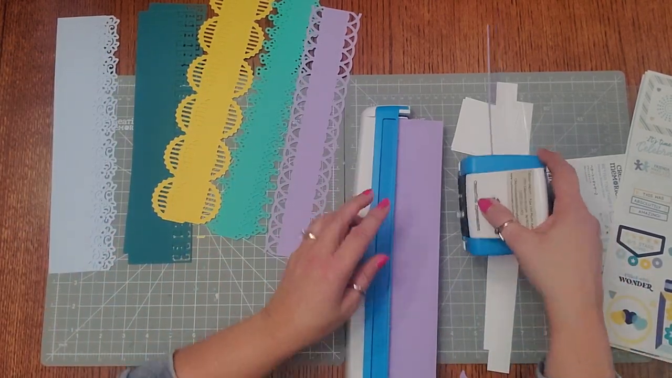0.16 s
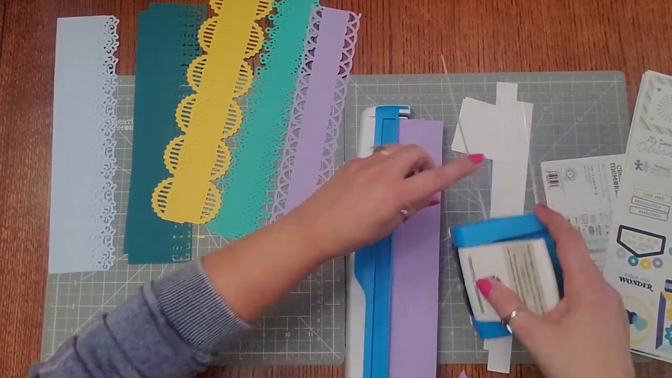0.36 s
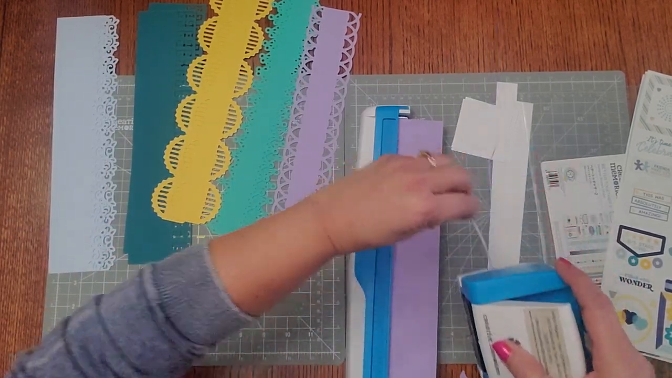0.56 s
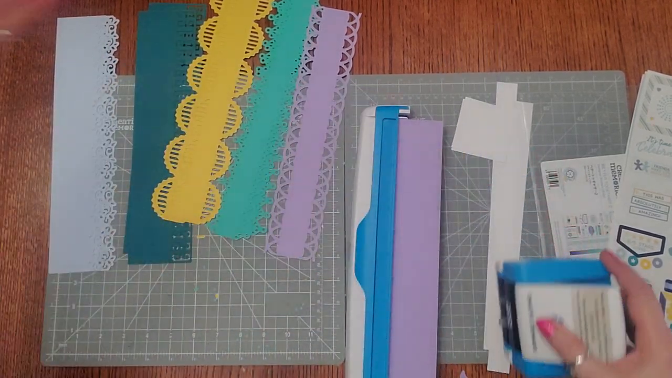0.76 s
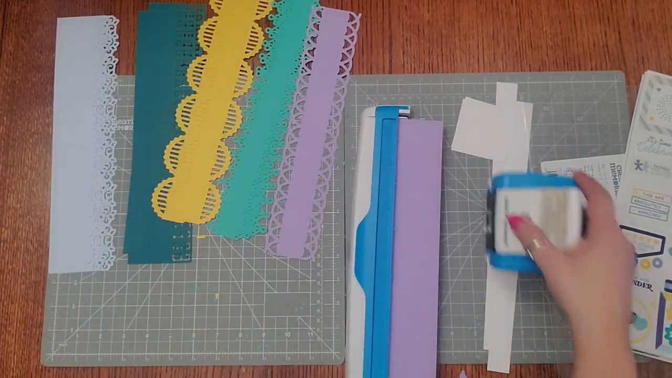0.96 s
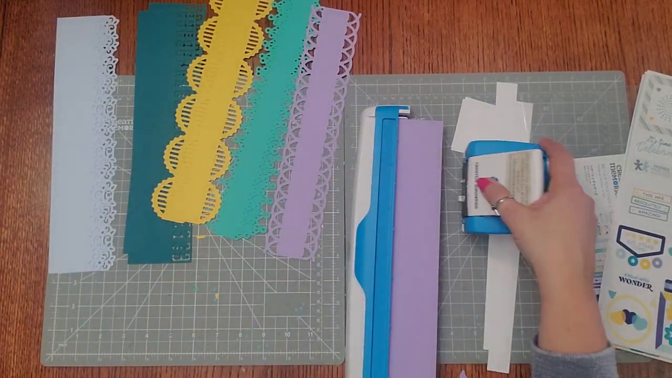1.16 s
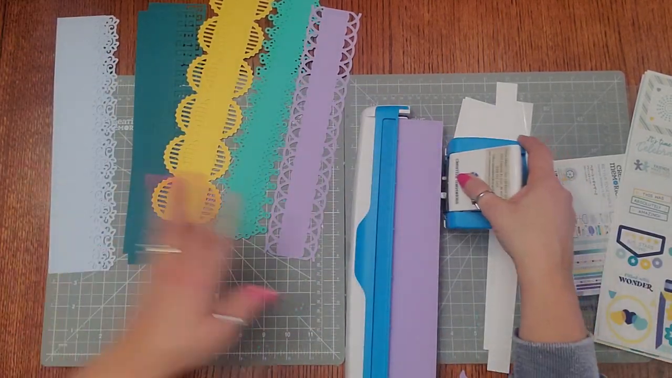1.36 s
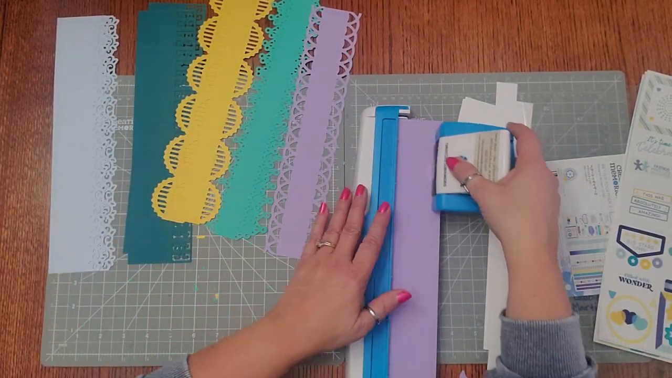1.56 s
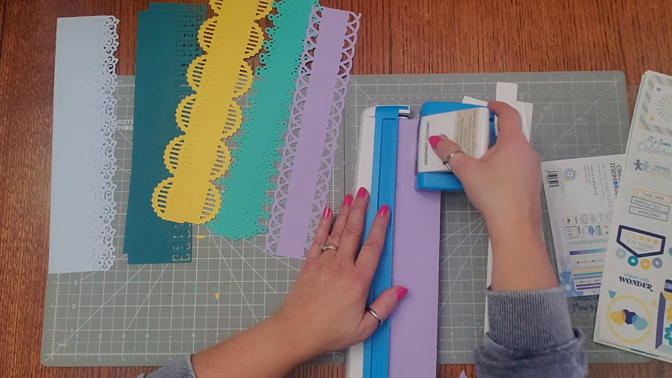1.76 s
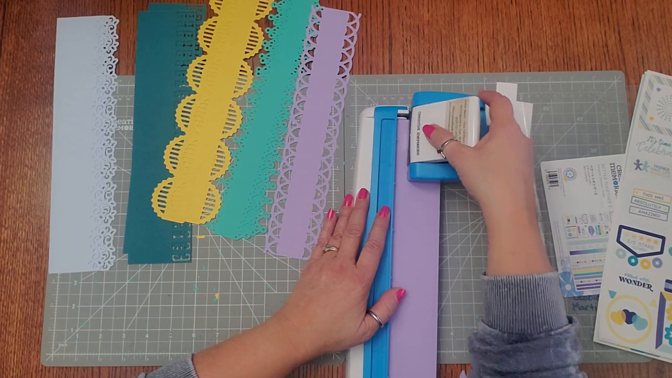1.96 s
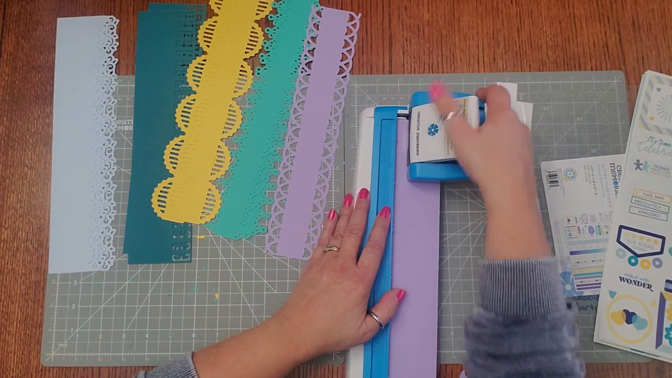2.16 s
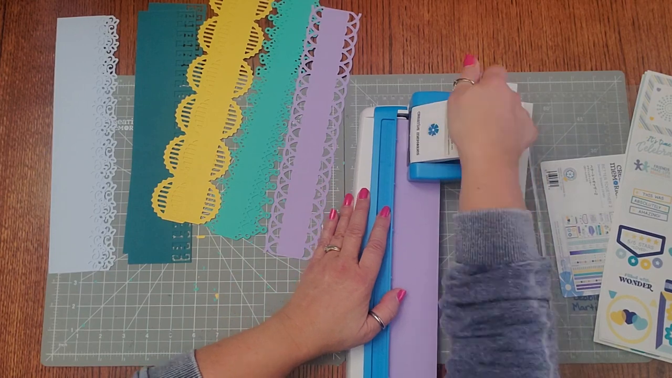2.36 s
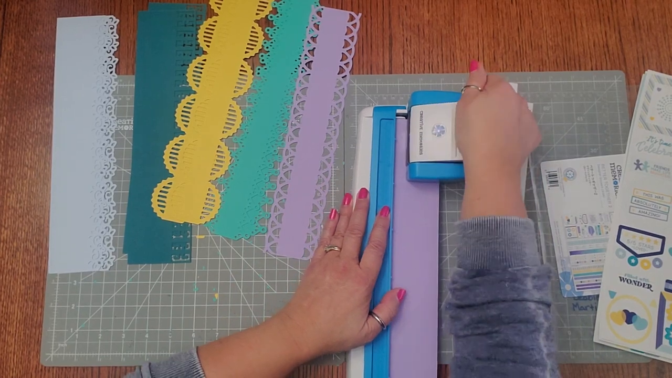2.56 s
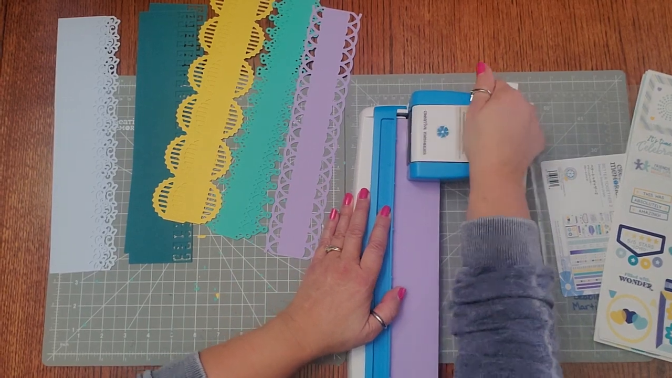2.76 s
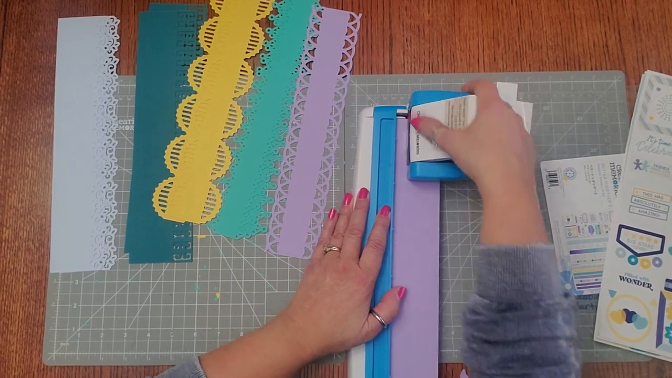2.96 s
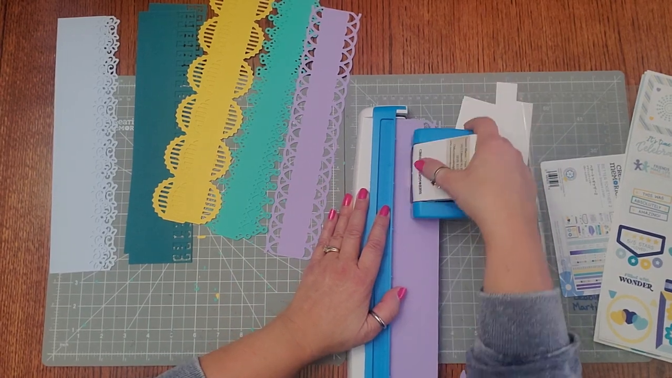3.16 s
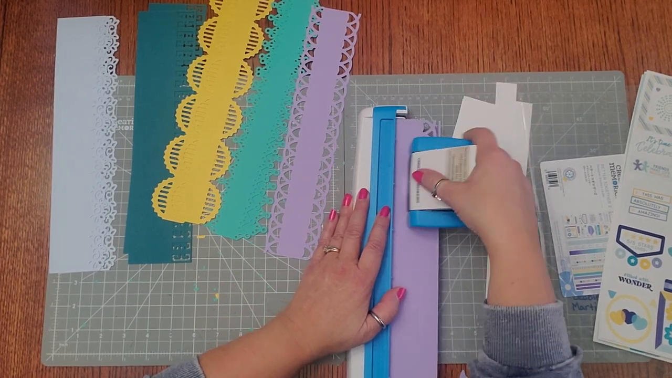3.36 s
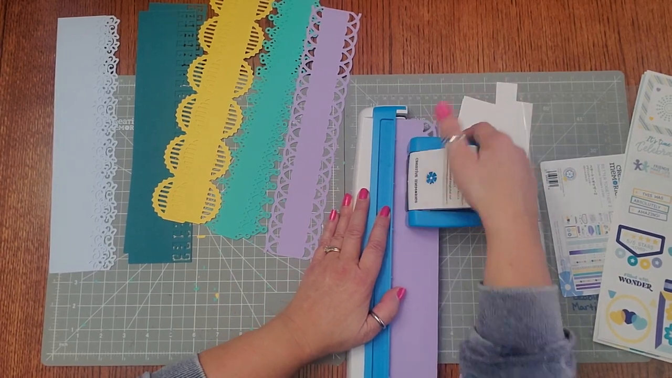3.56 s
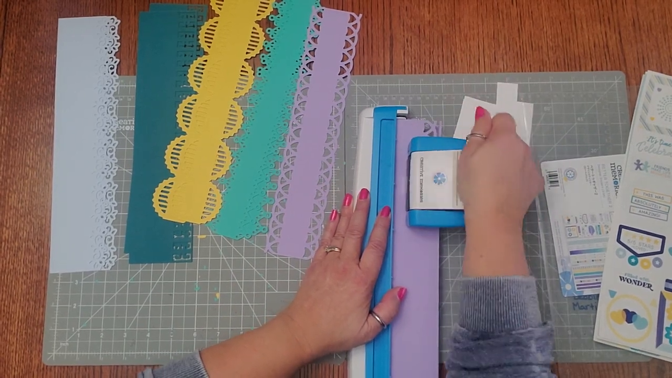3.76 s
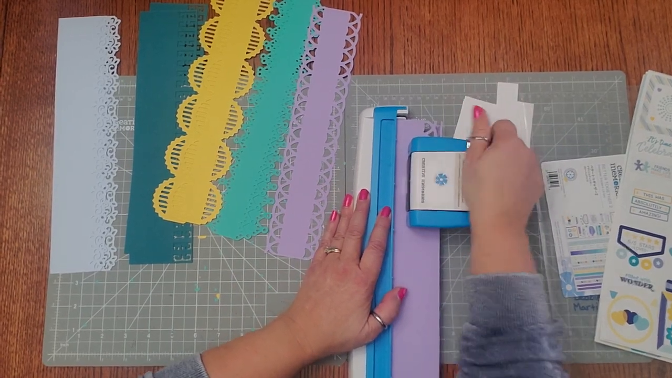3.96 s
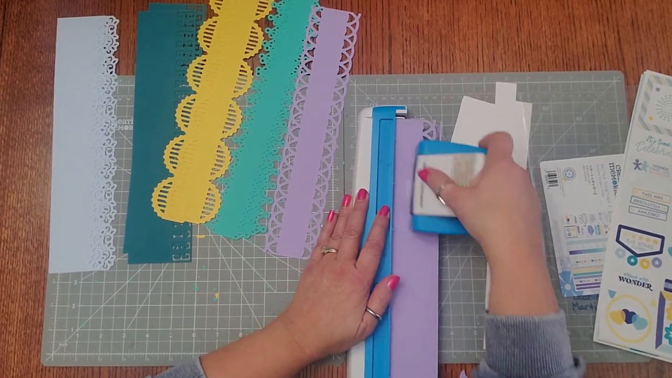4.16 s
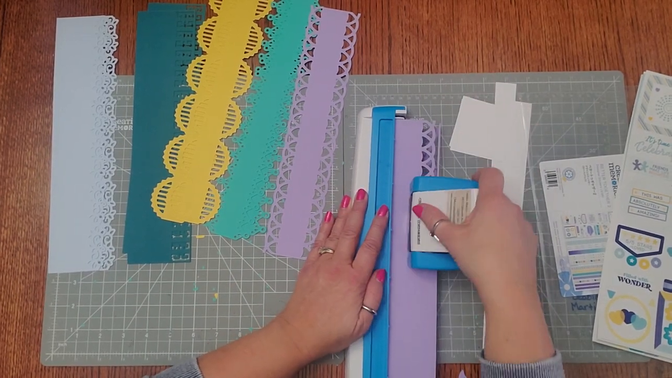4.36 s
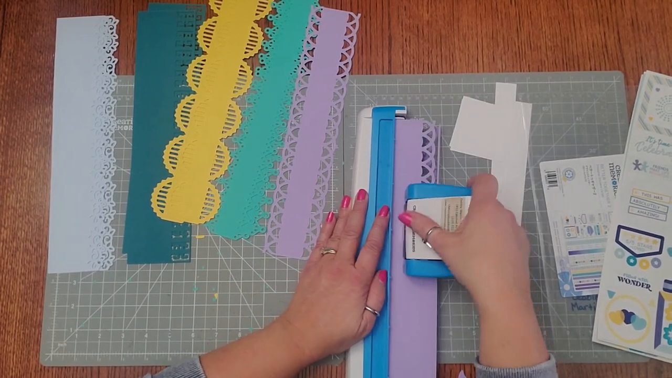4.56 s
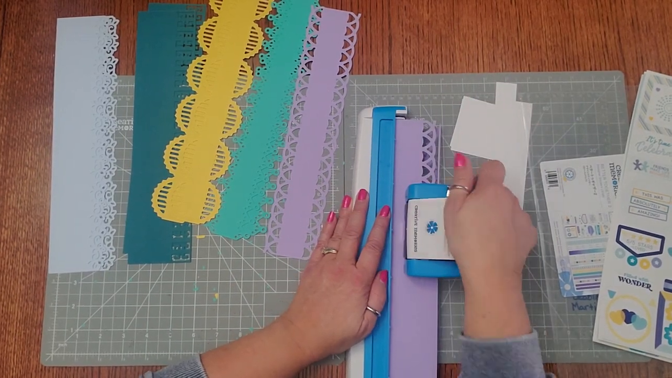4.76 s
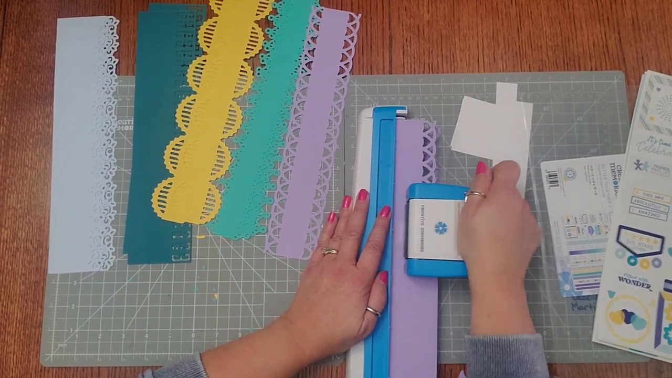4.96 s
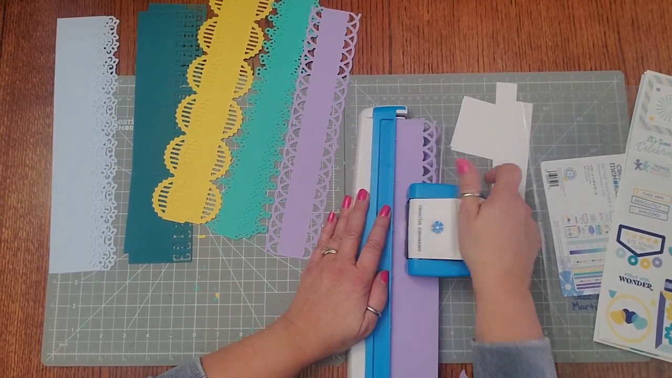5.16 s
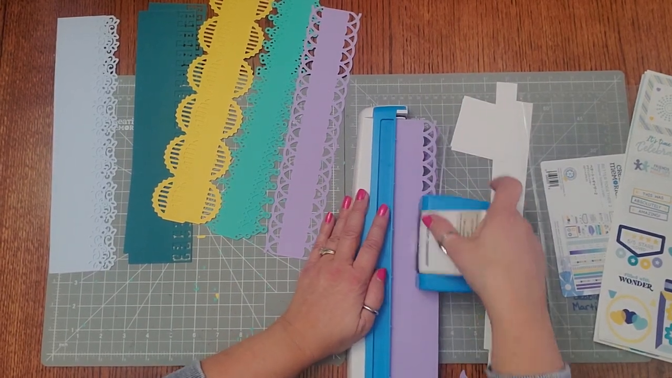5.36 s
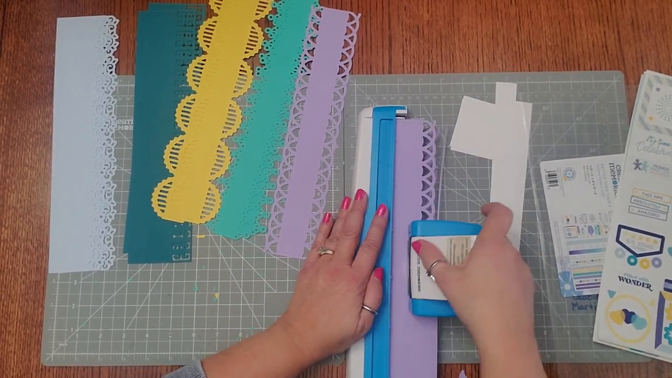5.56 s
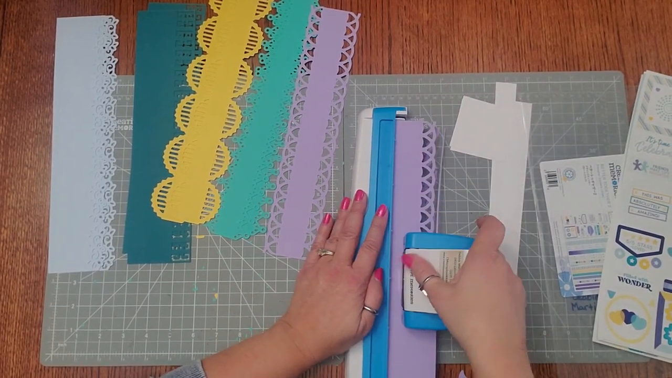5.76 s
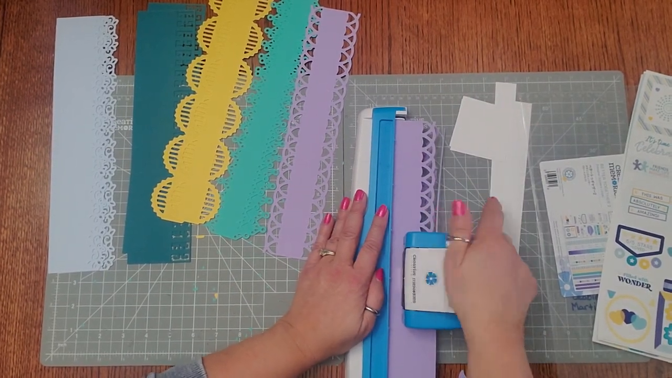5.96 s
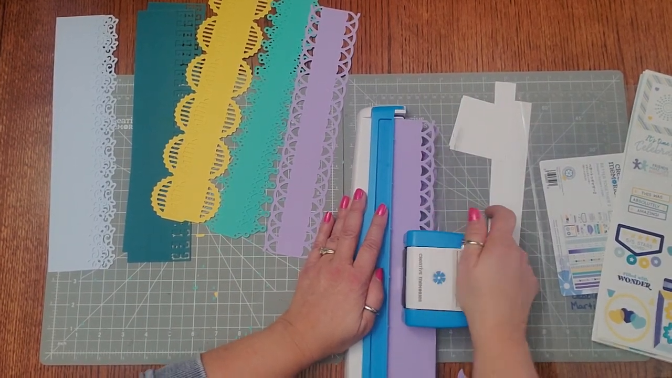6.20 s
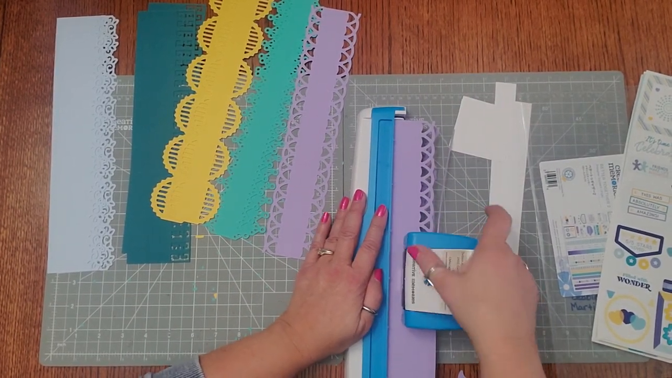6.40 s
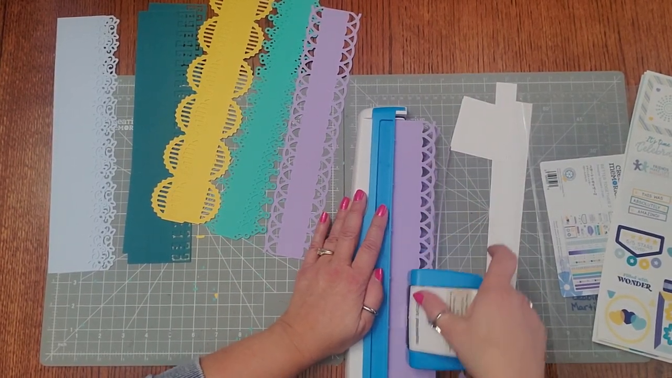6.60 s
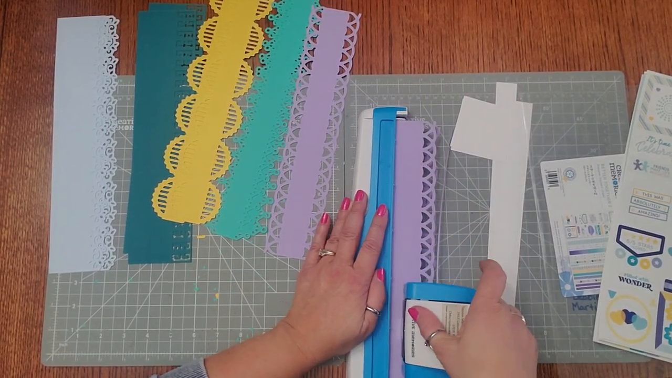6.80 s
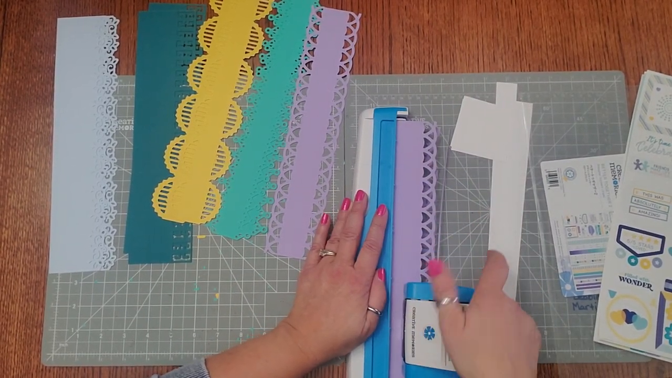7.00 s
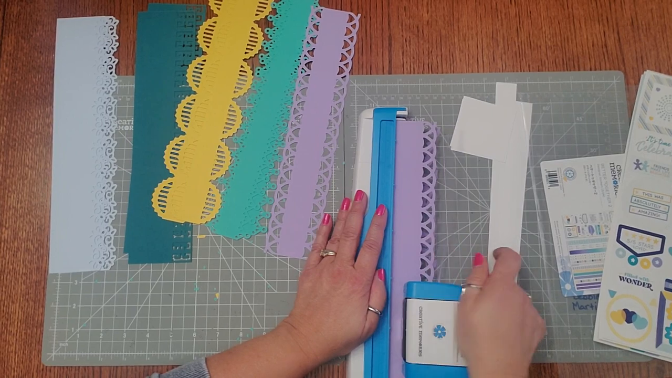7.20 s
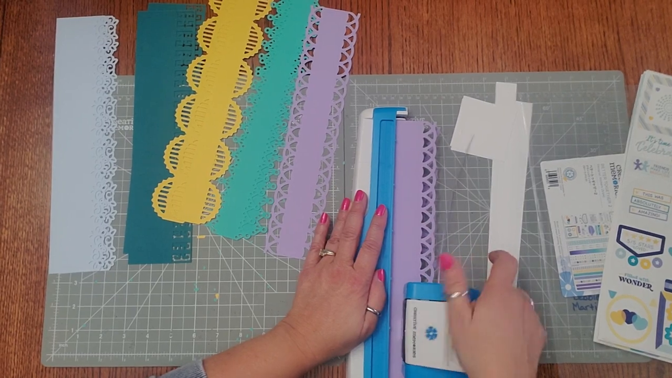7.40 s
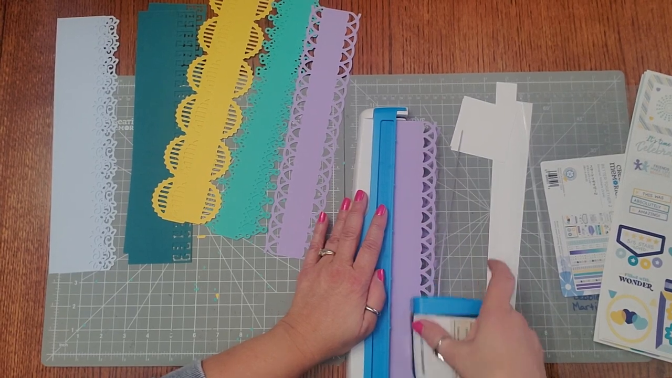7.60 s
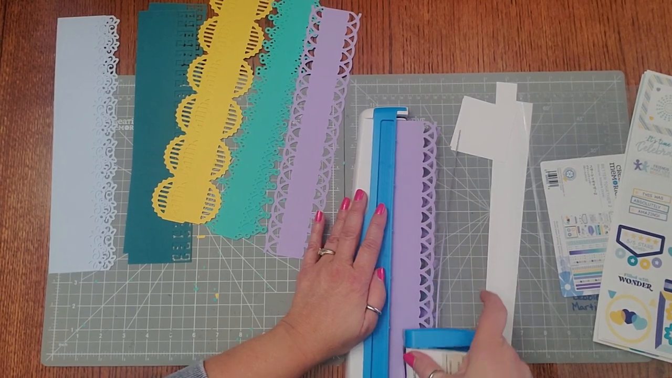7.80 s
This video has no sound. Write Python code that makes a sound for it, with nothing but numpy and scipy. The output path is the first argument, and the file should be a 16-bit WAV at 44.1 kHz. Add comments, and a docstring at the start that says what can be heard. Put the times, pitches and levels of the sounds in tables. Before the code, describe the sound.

Almost nothing at first but low room air, a faint hum and slight paper rustle. Then hands land softly and a plastic paper punch starts a regular cycle, five times over: hollow double clack, stuttering creaky bites, loud crunchy snap, papery slide, small bright click. Loose plastic ticks and the wooden table thumps beneath. Heard from overhead in stereo, with a short lively room tail, the right side duller.

```python
"""First you hear quiet room air, a faint hum, a sleeve brushing by and hands brushing paper; then a plastic
border punch at work. Five times its cartridge clacks into its seat, the lever bites in jerks, the die snaps
through card and slides back out, and the spring clicks home. Knocks are short noise bursts plus ringing tones,
rubbing and air are coloured noise, and a small live room answers every sound except the rubbing and the air. A
stereo microphone hangs overhead."""
import sys
import numpy as np
from scipy import signal
from scipy.fft import rfft, irfft, next_fast_len
from scipy.io import wavfile

SR = 44100
rng = np.random.default_rng(int(sys.argv[2]) if len(sys.argv) > 2 else 0)


def materialize(psi):
    """Save the field psi as 16-bit PCM at rate SR to the path in sys.argv[1].

    A 1-D psi becomes a single channel; in a 2-D psi each row is a channel.
    """
    bounded = np.clip(np.atleast_2d(psi).T, -1, 1)
    quanta = np.round(bounded * 32767).astype(np.int16)
    wavfile.write(sys.argv[1], SR, quanta)


N = 345744
T = np.arange(int(.7 * SR)) / SR  # time inside one short sound, seconds

# All levels in dB are relative settings.
# The die bottoms out, once a stroke: start_s, level_db, extra_thump_db, hardness_db, housing_pitch_hz
DIE_STOPS = [(2.713, -11.5, 9, 3, 400), (3.9, -7.5, 4.5, -1.5, 450), (5.049, -11.5, 8.5, -1.5, 357),
             (6.21, -8.5, 0.5, -2, 1590), (7.314, -8, 2, -2, 523)]
# Lever and die teeth bite under load: start_s, level_db, extra_thump_db, hardness_db, housing_pitch_hz
LEVER_BITES = [(2.534, -13, 0.5, 2, 714), (2.618, -13, 3, -5, 533), (2.664, -7, 4, 5.5, 356),
               (3.784, -15.5, 3.5, 0, 450), (3.822, -19, 2, -5, 523), (3.857, -8.5, 1, 3.5, 555),
               (4.904, -16, 0.5, 3, 527), (4.963, -12, -3.5, 2.5, 550), (6.101, -15, 3, 8, 460),
               (6.143, -16, 2.5, 2, 840), (6.165, -10, 0, 3.5, 540), (7.237, -15.5, -2, -0.5, 800),
               (7.277, -10, -0.5, 2.5, 600)]
# The cartridge drops into its seat, one edge and then flat:
# start_s, edge_level_db, flat_delay_s, flat_level_db, hardness_db, housing_pitch_hz
SEAT_DROPS = [(2.03, -16, 0.012, -13.5, -4, 960), (3.453, -22, .01, -15.5, -1.5, 1130),
              (4.547, -14, .007, -21.5, -6, 1150), (5.773, -13.5, .014, -12.5, 0, 1290),
              (6.892, -14, .019, -17.5, 1, 1400)]
# A corner touches the base: start_s, level_db, extra_thump_db, hardness_db, housing_pitch_hz
CORNER_TOUCHES = [(1.883, -21, -7.5, 0, 1050), (3.226, -23, 2.5, -10.5, 1210),
                  (4.384, -19, -1.5, -0.5, 1440), (5.635, -23, 0.5, -0.5, 1370), (6.673, -27, -1, -2, 1400),
                  (6.694, -25.5, 2.5, 0, 1400), (7.801, -19, -9, 3, 1390)]
# The spring throws the lever home: start_s, level_db, extra_thump_db, hardness_db, spring_pitch_hz
SPRING_CLICKS = [(3.055, -24, 3, -1, 6650), (4.175, -28.5, -5, 2.5, 5530), (5.346, -21.5, -12, -7.5, 5350),
                 (6.475, -28.5, 3.5, 7.5, 5400), (7.621, -30, -6, 1.5, 5500)]
# Light touches of loose plastic and fingernails: start_s, level_db, hardness_db
LIGHT_TICKS = [(1.118, -55, 15), (1.215, -47, 8), (2.202, -26, -10), (2.242, -28.5, 2), (2.464, -24.5, 12),
               (2.888, -33, 19), (2.949, -21, 12), (3.007, -22.5, 11.5), (3.627, -26, 6.5),
               (4.246, -20.5, -5), (4.839, -26, 6), (5.285, -20, 4), (6.08, -24, 6), (6.57, -32.5, 9),
               (7.201, -27, -1.5), (7.53, -19, 6.5), (7.675, -22, 4)]
# Hands land and the base rocks on the mat: start_s, level_db, hardness_db
SOFT_THUDS = [(1.504, -28, -20), (1.515, -36.5, -5), (1.832, -38, -11), (2.233, -32.5, -9.5),
              (2.511, -37, 3), (2.978, -28.5, 0.5), (3.101, -33.5, -4.5), (3.189, -31.5, -24),
              (3.39, -39.5, -28), (3.64, -35.5, -10), (3.765, -31.5, -4), (4.107, -26, -4),
              (4.273, -36, -13), (4.331, -41, -20), (4.885, -39, 3), (5.151, -31, -4.5), (5.312, -24.5, -5),
              (5.465, -38.5, -21), (6.443, -45, 1), (6.616, -36.5, -8), (7.55, -54, -19)]
# A sleeve brushes by, then hands brush the paper: middle_s, half_width_s, level_db
BRUSHES = [(0.703, 0.068, -64), (0.97, 0.054, -76), (1.242, 0.066, -69), (1.723, 0.24, -72.5)]

# Colour of the die hitting its stop: pitch_hz, level_db (per hertz)
CUT_COLOUR = [(180, -10.5), (300, -2.5), (385, -6), (634, 5.5), (1210, -3), (1360, -2), (2210, 9.5),
              (3080, 3), (4990, -12.5), (7200, -22), (10200, -23.5), (15000, -23.5), (16000, -40)]
# Colour of a lever bite: pitch_hz, level_db (per hertz)
BITE_COLOUR = [(180, -29.5), (300, 1.5), (433, 3), (574, 8.5), (856, -1.5), (978, -1.5), (1390, -5),
               (1560, -9.5), (1780, -12.5), (2740, -12), (6410, -34), (7320, -35), (10200, -36.5),
               (16000, -39)]
# Colour of the cartridge on its seat: pitch_hz, level_db (per hertz)
SEAT_COLOUR = [(180, -20.5), (300, -16.5), (624, -11.5), (856, -11), (1030, -23.5), (1340, -18),
               (1640, -17.5), (2520, -4), (2700, 3.5), (4670, -19), (7200, -29), (10400, -34.5),
               (15000, -38), (16000, -39)]
# Colour of the lever clicking home: pitch_hz, level_db (per hertz)
RETURN_COLOUR = [(180, -14), (300, -7), (480, -14), (720, -1), (1000, -10.5), (1450, -7), (2000, -3.5),
                 (2850, 2), (4000, -14.5), (5000, -15), (5600, -9), (6500, -11), (9000, -16.5),
                 (15500, -24)]
# Colour of a light tick: pitch_hz, level_db (per hertz)
TICK_COLOUR = [(180, -18), (300, -1.5), (1580, -2), (2320, 3.5), (2650, 9.5), (2980, 7.5), (4670, -20.5),
               (8500, -33), (10700, -36), (16000, -36)]
# Colour of a dull knock on the mat: pitch_hz, level_db
THUD_COLOUR = [(150, -7.0), (350, 2.0), (700, 1.5), (1500, -7.5), (4000, -12.5), (14000, -38.5)]
# Colour of the rubbing grip: pitch_hz, level_db (per hertz)
GRIP_COLOUR = [(24, -44.5), (40, -7), (104, -2), (167, -7), (542, -13), (965, -22), (2150, -21),
               (2630, -16), (7170, -44), (14500, -36.5), (16000, -43)]
# Colour of a brushing sleeve, brushed paper and the withdrawing die: pitch_hz, level_db (per hertz)
HISS_COLOUR = [(1500, -37), (3000, -3), (6000, -6), (10000, -5.5), (14000, -5.5), (16000, -13)]
# Colour of the ventilation: pitch_hz, level_db (per hertz)
AIR_COLOUR = [(20, -18), (60, -12), (110, -10), (200, -9.5), (390, -13), (560, -15.5), (1000, -20),
              (1600, -22.5), (2200, -29), (2700, -38), (5000, -47), (9000, -49), (16000, -52)]

# Ringing tones of the die: pitch_hz, level_db, t60_s (time to fall by 60 dB)
DIE_MODES = [(395, 7.5, 0.043), (1540, -11.5, 0.96), (2044, 3, 0.21), (2020, -10, 0.37), (2254, -4, 0.83),
             (2400, -0.5, 0.13), (2890, 3.5, 0.2)]
# Ringing tones of the lever: pitch_hz, level_db, t60_s
LEVER_MODES = [(388, 3, 0.47), (516, -19.5, 0.044), (596, 3.5, 0.14), (732.8, 4.5, 0.18),
               (819.4, 6.5, 0.15), (1940, -1, 0.097)]
# Ringing tones of the plastic shell: pitch_hz, level_db, t60_s
SHELL_MODES = [(546, 0, 0.17), (724, 11.5, 0.051), (839, 12.5, 0.1), (923, -19, 0.028), (1420, 0, 0.059),
               (1570, -52, .12)]
# Ringing tones of the spring: pitch_hz, level_db, t60_s
SPRING_MODES = [(2870, 14, 0.099), (2900, 7, 0.18), (5460, -9, 0.16), (6530, -9, 0.2), (7900, -4, 0.2),
                (10000, -20, 0.36)]
# Low tones of the wooden table: pitch_hz, level_db, t60_s
TABLE_MODES = [(43.8, -22.5, 0.77), (56, -14, 0.49), (86, -12.5, 0.39), (104, 0.5, 0.095), (120.5, 7, 0.03),
               (165.4, 0.5, 0.12), (191, -6.5, 0.068), (218.3, -9.5, 0.16), (260, -2.5, 0.086),
               (328.7, -0.5, 0.11)]
# Low tones of the cutting mat: pitch_hz, level_db, t60_s
MAT_MODES = [(97, 0, 0.16), (135, -0.5, 0.2), (156.8, -4.5, 0.22), (175.8, -6.5, 0.5), (231, -1, 0.19),
             (296, 3.5, 0.063), (373, -12.5, 0.24)]

# How long the room rings: pitch_hz, t60_s
ROOM_DECAY = [(60, 0.081), (250, 0.54), (700, 0.46), (2000, 0.42), (5000, 0.38), (14000, 0.29)]
# How alike left and right are in sound from all sides: pitch_hz, likeness (1 = the same)
STEREO_LIKENESS = [(100, 0.94), (250, 0.45), (500, 0.93), (1000, 0.093), (3000, 0.015)]
# Tone of the right microphone port against the left: pitch_hz, level_db
RIGHT_PORT_TONE = [(200, .5), (500, -1), (1000, -4), (2500, -6), (5000, -7.5), (7000, -14.5), (8100, -12.5),
                   (9200, -4), (10300, 3.5), (13000, -7), (16000, -4)]


def cutting(break_lead_s=0.0064, break_db=-0.5, break_hardness_db=-10, break_hz=400):
    """The card breaks with a dull crunch, then the die hits its stop with a sharp crack."""
    contacts = []
    for start_s, db, thump_db, hardness_db, hz in DIE_STOPS:
        contacts.append((start_s - break_lead_s, db + break_db, thump_db,
                         hardness_db + break_hardness_db, break_hz))
        contacts.append((start_s, db, thump_db, hardness_db, hz))
    return clacks(contacts, CUT_COLOUR, DIE_MODES, TABLE_MODES,
                  knock_db=-14.5, clack_db=-13, crack_db=-10.5, ring_db=-22.5, thump_db=-24.5,
                  knock_t60=0.031, clack_t60=0.097, crack_t60=0.025,
                  spike=8.5, grain_db=2.5, hollow=0.85, wet_db=0.0, detune=.014)


def biting(settle_s=.012, settle_db=-3, settle_thump_db=3, settle_hardness_db=-9):
    """The lever goes down in jerks; after each, the load settles on the table, weaker and duller."""
    contacts = []
    for start_s, db, thump_db, hardness_db, hz in LEVER_BITES:
        contacts.append((start_s, db, thump_db, hardness_db, hz))
        contacts.append((start_s + settle_s, db + settle_db, thump_db + settle_thump_db,
                         hardness_db + settle_hardness_db, hz))
    return clacks(contacts, BITE_COLOUR, LEVER_MODES, TABLE_MODES,
                  knock_db=-14.0, clack_db=-15.5, crack_db=-27.5, ring_db=-18.0, thump_db=-20,
                  knock_t60=0.064, clack_t60=0.061, crack_t60=0.14,
                  spike=6.6, grain_db=1, hollow=0.21, wet_db=-2.5)


def seating(graze_lead_s=0.01, graze_db=-19, graze_hardness_db=-9, edge_thump_db=-15.5):
    """The cartridge touches on a corner, grazes the rim and drops into its seat with a double clack."""
    contacts = list(CORNER_TOUCHES)
    for start_s, edge_db, delay_s, flat_db, hardness_db, hz in SEAT_DROPS:
        # an edge alone hardly shakes the mat
        contacts.append((start_s - graze_lead_s, edge_db + graze_db, edge_thump_db, graze_hardness_db, hz))
        contacts.append((start_s, edge_db, edge_thump_db, hardness_db, hz))
        contacts.append((start_s + delay_s, flat_db, 0, hardness_db, hz))
    return clacks(contacts, SEAT_COLOUR, SHELL_MODES, MAT_MODES,
                  knock_db=-8.5, clack_db=-6, crack_db=-13.5, ring_db=-22, thump_db=-19.0,
                  knock_t60=0.049, clack_t60=0.063, crack_t60=0.11,
                  spike=3.3, grain_db=5.5, hollow=2.35, wet_db=-4.0, sharpness=4.9, detune=0.028)


def spring_return():
    """The lever clicks home and its spring rings."""
    return clacks(SPRING_CLICKS, RETURN_COLOUR, SPRING_MODES, MAT_MODES,
                  knock_db=-10.5, clack_db=0.5, crack_db=-8, ring_db=-15, thump_db=-19.0,
                  knock_t60=0.083, clack_t60=0.047, crack_t60=0.035,
                  spike=8.6, grain_db=1.5, hollow=0.98, wet_db=-5.5, detune=0.0031)


def ticking(housing_hz=700):
    """Light touches make the loose plastic housing tick."""
    contacts = [(start_s, db, 0, hardness_db, housing_hz) for start_s, db, hardness_db in LIGHT_TICKS]
    return clacks(contacts, TICK_COLOUR, SHELL_MODES, MAT_MODES,
                  knock_db=-21, clack_db=-16.5, crack_db=-24, ring_db=-23, thump_db=-26.5,
                  knock_t60=0.046, clack_t60=0.033, crack_t60=.03,
                  spike=3, grain_db=6.5, hollow=0.37, wet_db=-2.0)


def thuds(thump_db=-7, knock_db=-5, knock_t60=0.15, wet_db=-5):
    """Soft blows through the cutting mat: its low tones ring under a dull noise knock."""
    track = np.zeros((2, N))
    dull = causal(THUD_COLOUR)
    for start_s, db, hardness_db in SOFT_THUDS:
        burst = rng.standard_normal(len(T)) * fade(knock_t60)
        knock = unit_attack(signal.fftconvolve(burst, dull)[:len(T)])
        add(track, start_s, amp(db + thump_db) * ring(MAT_MODES, attack_s=0.0053, detune=0.03))
        add(track, start_s, amp(db + hardness_db + knock_db) * knock)
    return in_room(track, wet_db)


def rubbing(grain_db=3, grains_per_s=150):
    """Hand and plastic drag in small catches; the die hisses as it withdraws; a sleeve and hands brush by."""
    points = np.arange(N) / SR * grains_per_s
    catches = unit(amp(grain_db * np.interp(points, np.arange(N), rng.standard_normal(N))))
    # swell takes: middle s, half width s, level dB; the cartridge slides to find its seat
    drag = sum(swell(start_s - .07, .1, -66) for start_s, *_ in SEAT_DROPS)
    hiss = sum(swell(*row) for row in BRUSHES)
    for start_s, *_ in DIE_STOPS:
        drag += swell(start_s - 0.035, 0.15, -48.5)  # the hand bears down
        drag += swell(start_s + 0.21, 0.24, -44.5)  # it lets go
        drag += swell(start_s + 0.48, 0.18, -58.5)  # it moves the cartridge on
        hiss += swell(start_s + 0.2, .05, -47.5)  # the die slides back out through the card
    return catches * (drag * rush(GRIP_COLOUR) + hiss * rush(HISS_COLOUR))


def room_tone(air_db=-59.5, hum_hz=251, hum_db=-68, wander=0.023):
    """Quiet ventilation noise with a faint hum that wavers in pitch."""
    drift = wander * np.cumsum(rng.standard_normal(N))
    hum = unit(np.sin(2 * np.pi * hum_hz * np.arange(N) / SR + drift))
    return amp(air_db) * rush(AIR_COLOUR) + amp(hum_db) * hum


def clacks(contacts, colour, modes, support, knock_db, clack_db, crack_db, ring_db, thump_db,
           knock_t60, clack_t60, crack_t60, spike, grain_db, hollow, wet_db,
           detune=0.0131, apart=0.96, sharpness=5):
    """Hard contacts: a spike and grainy rattle, the ring of the struck part, a thump of its support."""
    track = np.zeros((2, N))
    size = SR // 6
    colouring = causal(colour)[None]
    ranges = (1700, "low"), ([1700, 4600], "band"), (4200, "high")
    bands = [signal.butter(3, hz, kind, fs=SR, output="sos") for hz, kind in ranges]
    for start_s, db, extra_thump_db, hardness_db, resonance_hz in contacts:
        # loose parts chatter in millisecond grains, a little differently towards each port
        grain_levels = np.repeat(rng.standard_normal(size // 40), SR // 1000)[:size]
        grains = unit(amp(grain_db * grain_levels))
        rattle = grains * (rng.standard_normal(size) + apart * rng.standard_normal((2, size)))
        rattle[:, 0] = spike
        rattle = signal.fftconvolve(rattle, colouring, axes=1)[:, :size]
        # the point of contact decides which resonance of the housing or spring stands out
        peak_filter = signal.iirpeak(resonance_hz, sharpness, fs=SR)
        rattle = rattle + hollow * signal.lfilter(*peak_filter, rattle)
        # housing, lever and edges share the blow; a harder contact is brighter
        shares_db = knock_db, clack_db + hardness_db / 2, crack_db + hardness_db
        for band, share_db, t60 in zip(bands, shares_db, (knock_t60, clack_t60, crack_t60)):
            burst = unit_attack(signal.sosfilt(band, rattle) * fade(t60)[:size])
            add(track, start_s, amp(db + share_db) * burst)
        struck_part = ring(modes, attack_s=0.00056, detune=detune)
        thump = ring(support, attack_s=0.0051, detune=0.038)
        add(track, start_s, amp(db + ring_db) * struck_part)
        add(track, start_s, amp(db + extra_thump_db + thump_db) * thump)
    return in_room(track, wet_db)


def ring(modes, attack_s, detune, scatter_db=2, wander=.055):
    """Fading tones, slightly detuned at random for each blow, whose wandering phases make them fuzzy."""
    hz, db, t60 = np.transpose(modes)[:, :, None]
    scatter, shift, polarity = rng.standard_normal((3, len(modes), 1))
    t = T[:SR // 3]
    steps = rng.standard_normal((len(modes), len(t)))
    drift = wander * np.cumsum(steps, axis=1) * np.sqrt(hz / 1000)
    level = np.sign(polarity) * amp(db + scatter_db * scatter)
    decay = np.exp(-np.log(1000) * t / t60)
    tones = level * decay * np.sin(2 * np.pi * hz * (1 + detune * shift) * t + drift)
    return unit_attack(tones.sum(0) * (1 - np.exp(-t / attack_s)))


def in_room(x, wet_db, build_s=0.0016, early_db=-15, count=6):
    """Sound reaches the left port first; near surfaces slap back, then the room answers with a tail."""
    delays_s = np.array([[0], [5 / SR]])
    out = filtered(x, lambda hz: np.exp(-2j * np.pi * hz * delays_s))
    for start in range(0, N, SR // 5):
        part = x[:, start:start + SR // 5]
        if np.abs(part).max() > 1e-6:
            # each pitch of the noise tail fades at its own rate
            hz, t, z = signal.stft(diffuse(len(T)), SR, nperseg=256)
            decay = np.exp(-np.log(1000) * t / along(ROOM_DECAY, hz)[:, None])
            tail = signal.istft(z * decay, SR, nperseg=256)[1][:, :len(T)]
            tail *= 1 - np.exp(-(T / build_s) ** 2)
            tail /= np.linalg.norm(tail[0])
            # each fifth of a second gets freshly drawn early echoes;
            # each echo meets the ports a few samples apart
            paths = rng.integers(SR // 300, SR // 45, count) + rng.integers(-6, 7, (2, count))
            tail[[[0], [1]], paths] += amp(early_db) * rng.choice([-1, 1], count)
            add(out, start / SR, amp(wet_db) * signal.fftconvolve(part, tail, axes=1))
    return out


def rush(colour):
    """Steady coloured stereo noise of rms 1."""
    return unit(filtered(diffuse(N), lambda hz: amp(along(colour, hz))))


def diffuse(size):
    """Stereo noise from all sides: alike in the bass, nearly unrelated in the high treble."""
    def mid_and_side(hz):
        angle = np.arccos(np.clip(along(STEREO_LIKENESS, hz), -1, 1)) / 2
        return np.array([np.cos(angle), np.sin(angle)])
    mid, side = filtered(rng.standard_normal((2, size)), mid_and_side)
    return np.array([mid + side, mid - side])


def swell(middle_s, half_width_s, db):
    """A smooth bell-shaped rise and fall of gain."""
    return amp(db) * np.exp(-2 * ((np.arange(N) / SR - middle_s) / half_width_s) ** 2)


def causal(points, size=1024):
    """A filter with this colour whose energy comes as early as possible (minimum phase)."""
    level_db = np.maximum(along(points, np.fft.rfftfreq(size, 1 / SR)), -100)
    cepstrum = irfft(np.log(amp(level_db)))
    # fold the second half onto the first, so that nothing sounds ahead of time zero
    cepstrum[1:size // 2] *= 2
    cepstrum[size // 2 + 1:] = 0
    return irfft(np.exp(rfft(cepstrum)))


def filtered(x, response):
    """Multiply the spectrum of x by a function of frequency."""
    n = x.shape[-1]
    m = next_fast_len(n + 2048, True)
    return irfft(rfft(x, m) * response(np.fft.rfftfreq(m, 1 / SR)), m)[..., :n]


def along(points, hz):
    """Read a value between (pitch_hz, value) points on a log pitch axis."""
    f, v = np.transpose(points)
    return np.interp(np.log(hz + 1), np.log(f + 1), v)


def fade(t60):
    """A decay of 60 dB in t60 seconds."""
    return np.exp(-np.log(1000) * T / t60)


def unit_attack(x):
    """Scale a blow to rms 1 over its first fiftieth of a second."""
    return x / np.sqrt(np.mean(x[..., :SR // 50] ** 2) + 1e-20)


def unit(x):
    """Scale a sound to rms 1."""
    return x / np.sqrt(np.mean(x ** 2) + 1e-20)


def amp(db):
    """Turn decibels into a gain."""
    return 10 ** (np.asarray(db) / 20)


def add(track, start_s, sound):
    """Mix a sound into the track from start_s on."""
    part = track[:, round(start_s * SR):][:, :sound.shape[-1]]
    part += sound[..., :part.shape[1]]


def scene():
    """The punch, the hands and the quiet room together."""
    punch = cutting() + biting() + seating() + spring_return() + ticking()
    return punch + thuds() + rubbing() + room_tone()


def record(dry, gain_db=1.5, ceiling=.95, low_hz=30, top_hz=15900):
    """The right port is duller; the highest peaks round off; deep bass and the extreme treble are cut."""
    right = signal.fftconvolve(dry[1], causal(RIGHT_PORT_TONE))[:N]
    ports = amp(gain_db) * np.array([dry[0], right])
    rounded = ports / (1 + np.abs(ports / ceiling) ** 6) ** (1 / 6)

    def band_limits(hz):
        bass_cut = hz ** 2 / np.hypot(hz ** 2, low_hz ** 2)
        return bass_cut / np.sqrt(1 + (hz / top_hz) ** 160)
    return filtered(rounded, band_limits)


dry = scene()
out = record(dry)
materialize(out)
```